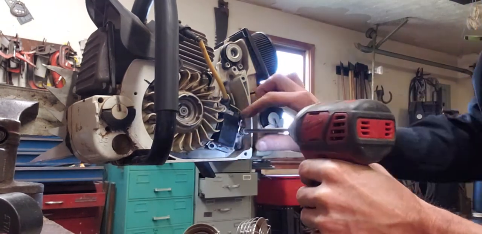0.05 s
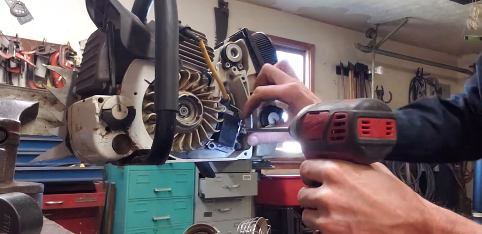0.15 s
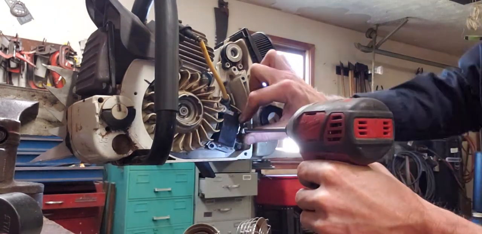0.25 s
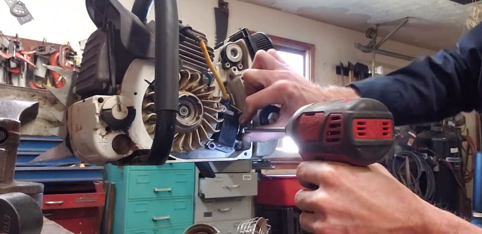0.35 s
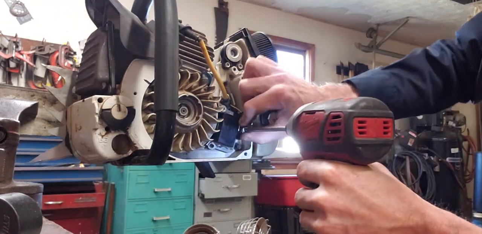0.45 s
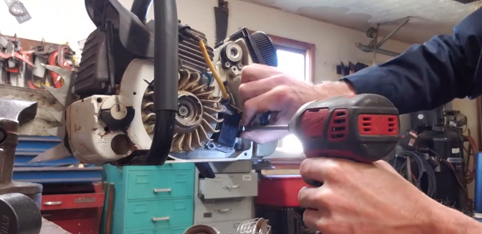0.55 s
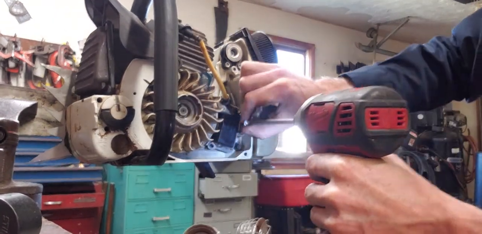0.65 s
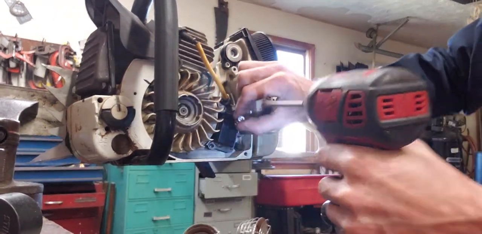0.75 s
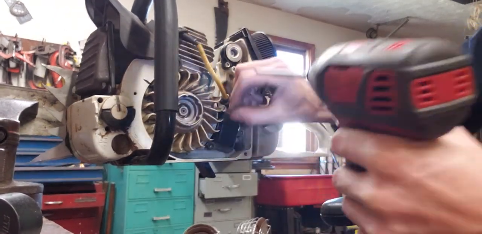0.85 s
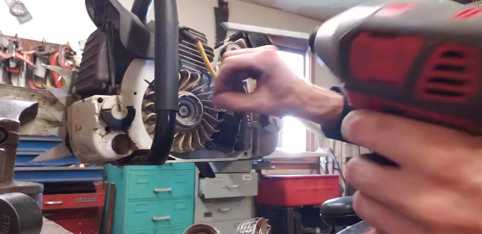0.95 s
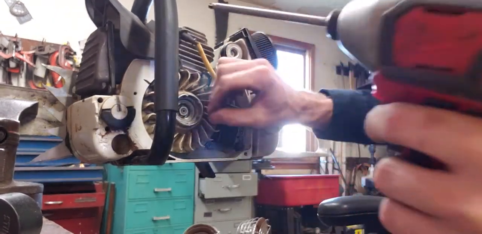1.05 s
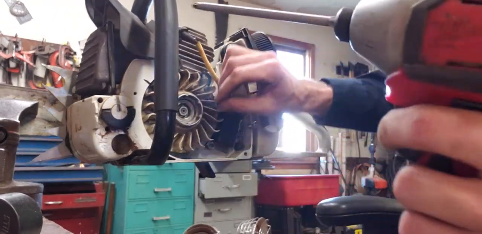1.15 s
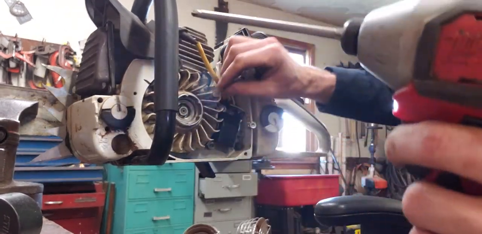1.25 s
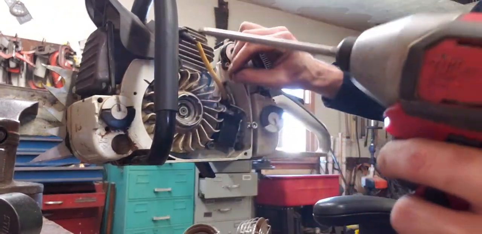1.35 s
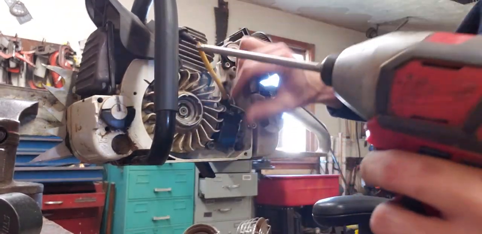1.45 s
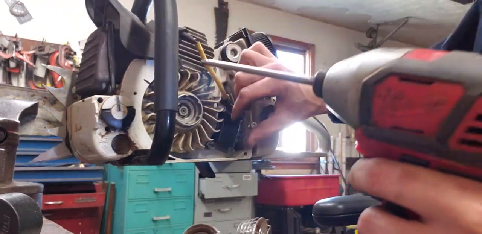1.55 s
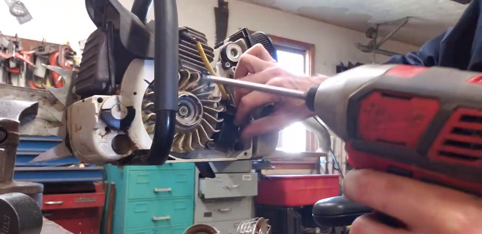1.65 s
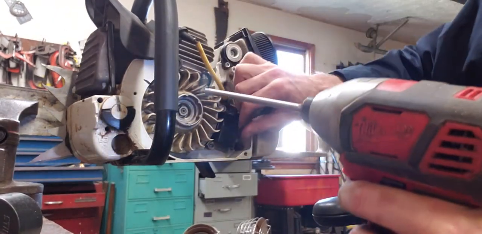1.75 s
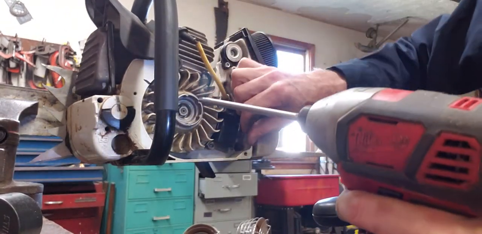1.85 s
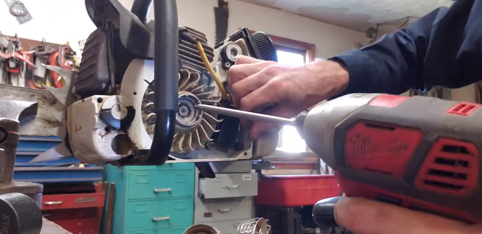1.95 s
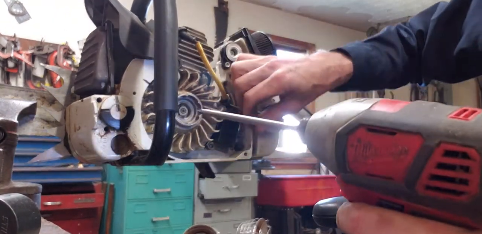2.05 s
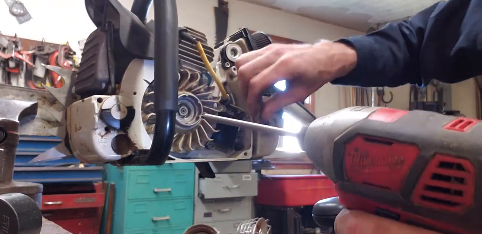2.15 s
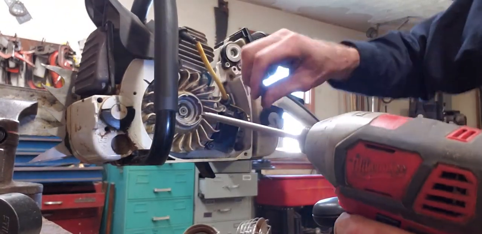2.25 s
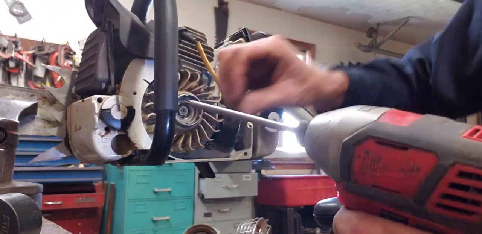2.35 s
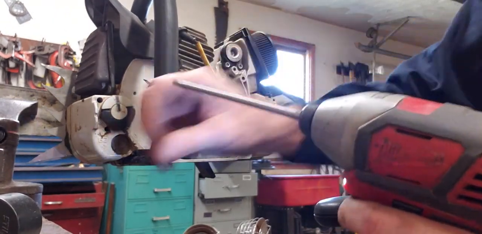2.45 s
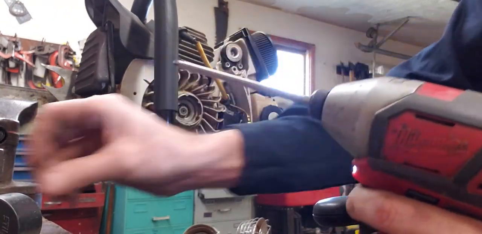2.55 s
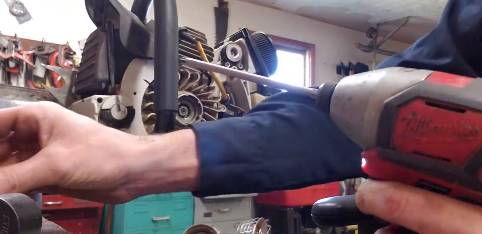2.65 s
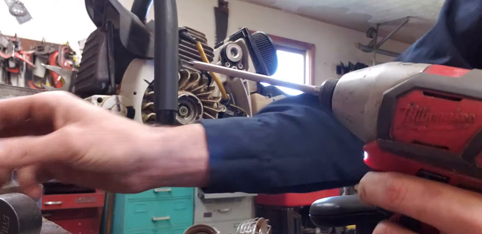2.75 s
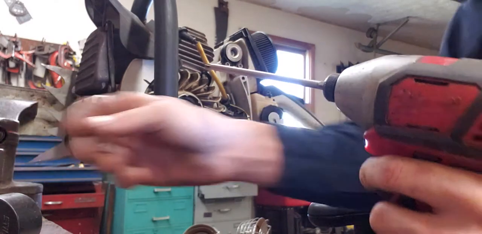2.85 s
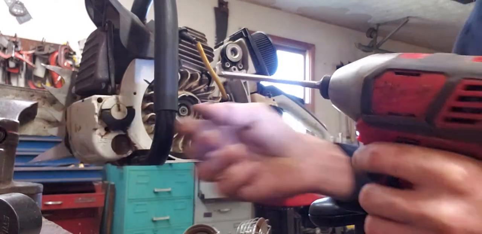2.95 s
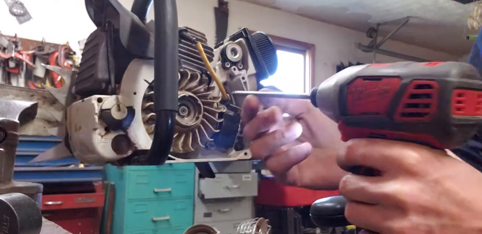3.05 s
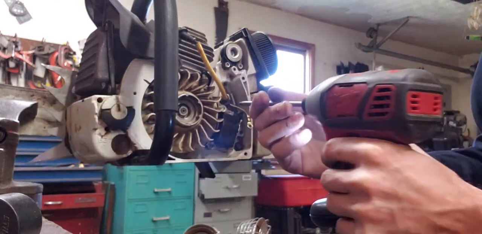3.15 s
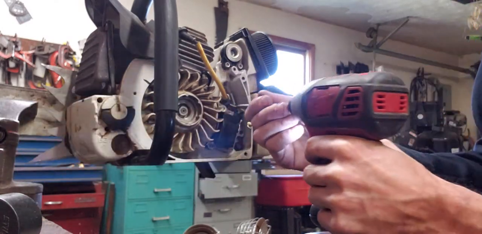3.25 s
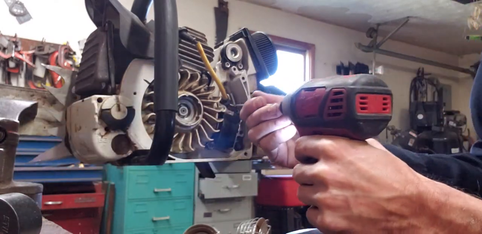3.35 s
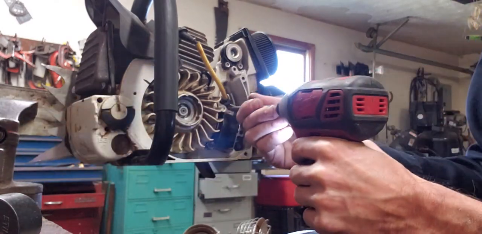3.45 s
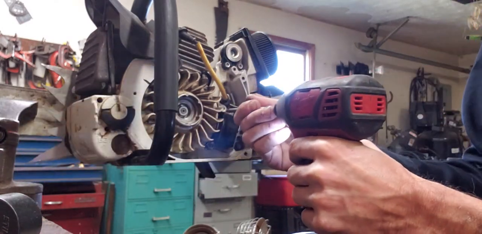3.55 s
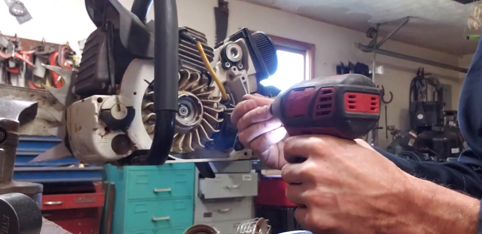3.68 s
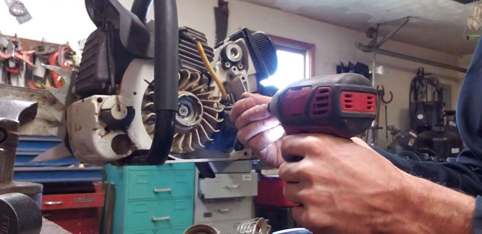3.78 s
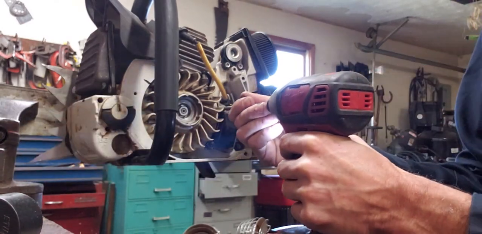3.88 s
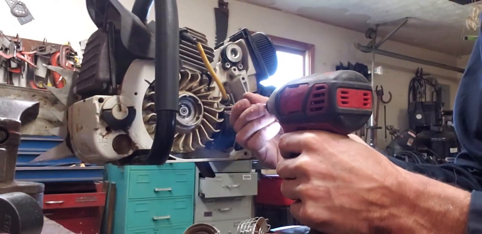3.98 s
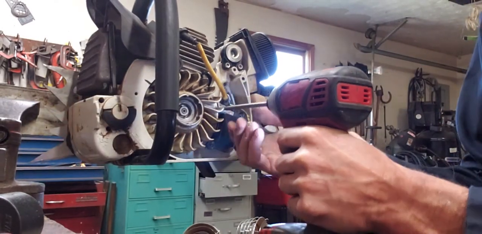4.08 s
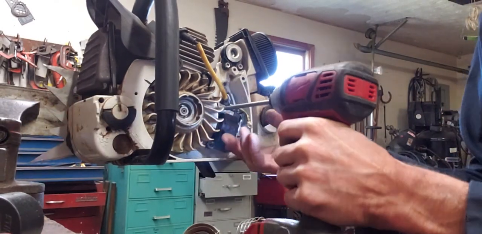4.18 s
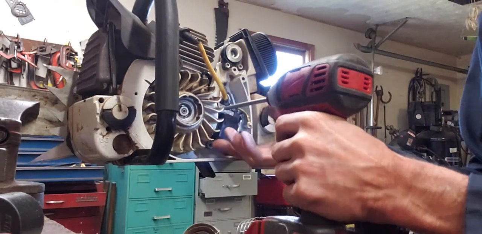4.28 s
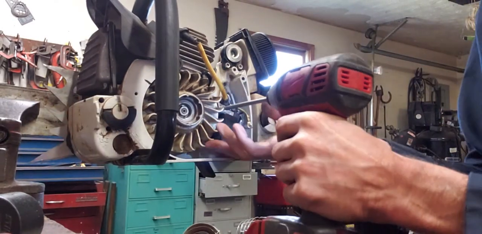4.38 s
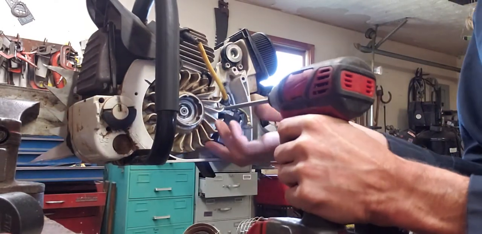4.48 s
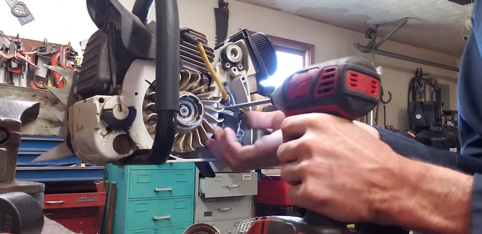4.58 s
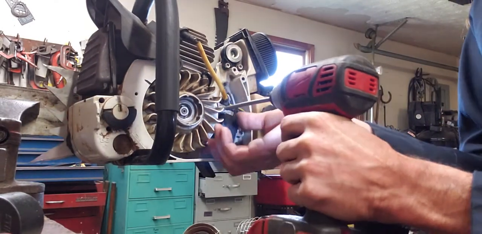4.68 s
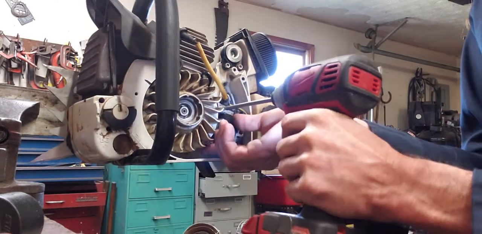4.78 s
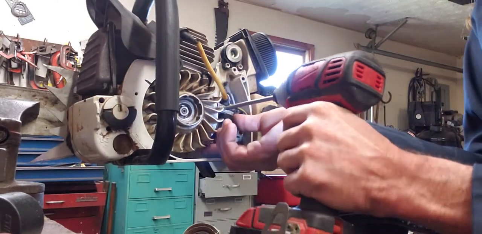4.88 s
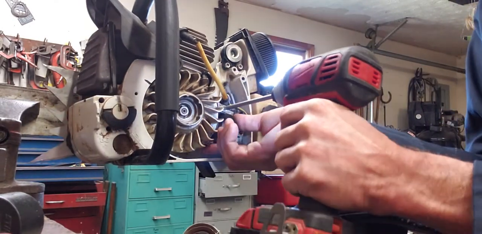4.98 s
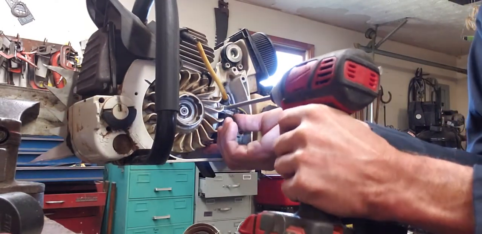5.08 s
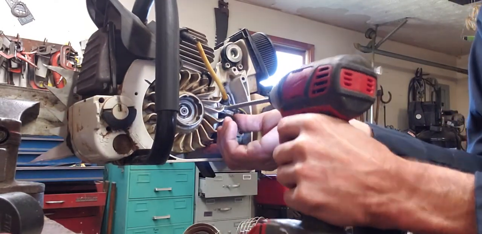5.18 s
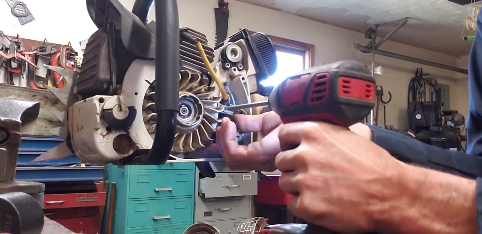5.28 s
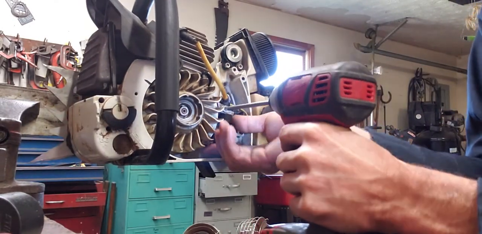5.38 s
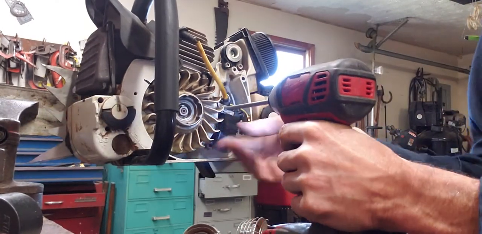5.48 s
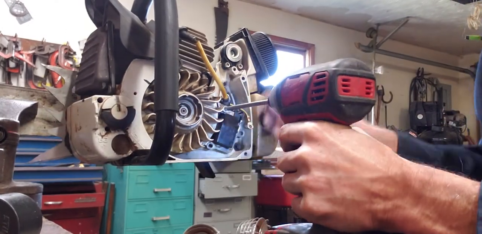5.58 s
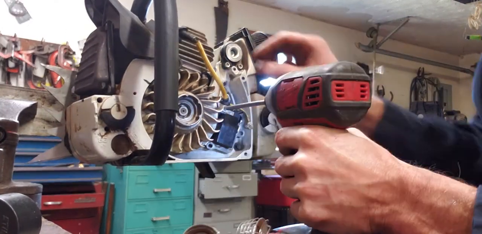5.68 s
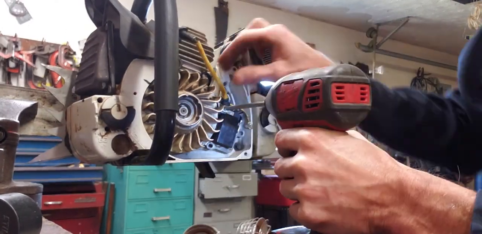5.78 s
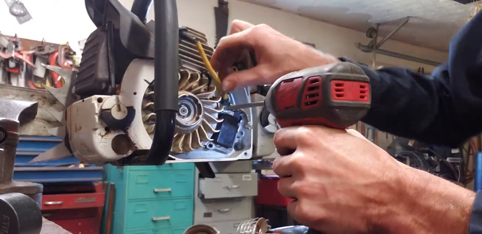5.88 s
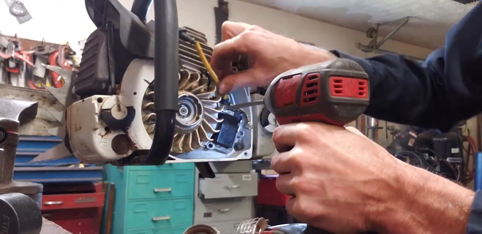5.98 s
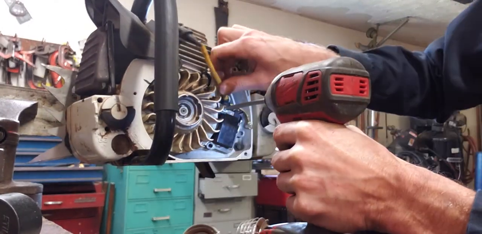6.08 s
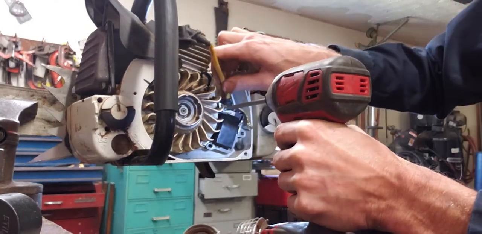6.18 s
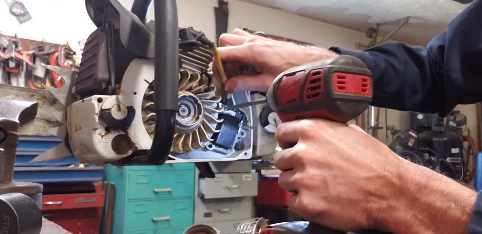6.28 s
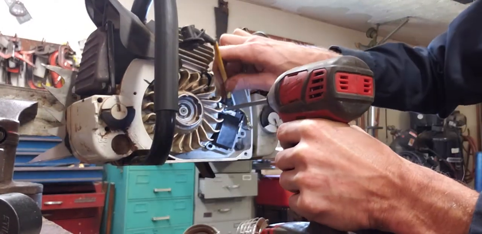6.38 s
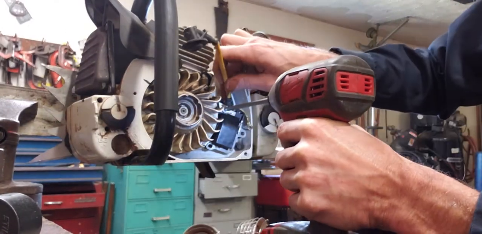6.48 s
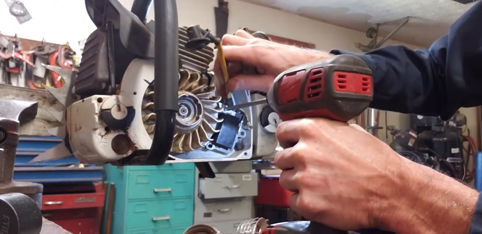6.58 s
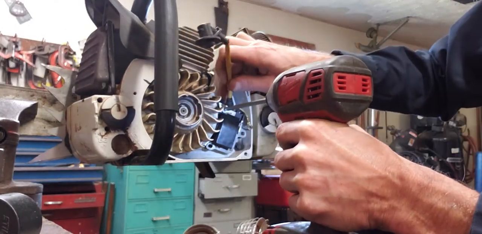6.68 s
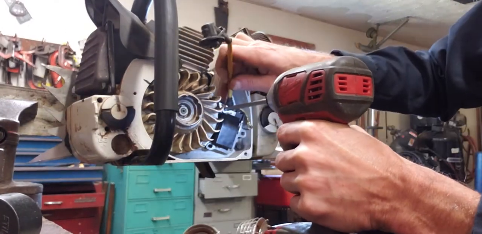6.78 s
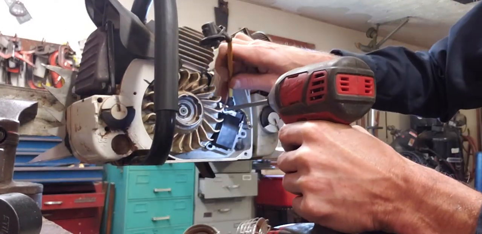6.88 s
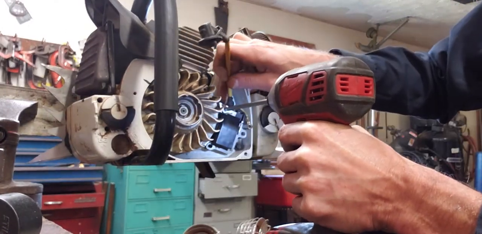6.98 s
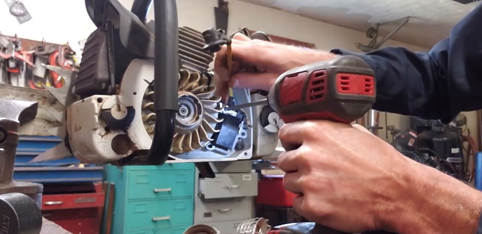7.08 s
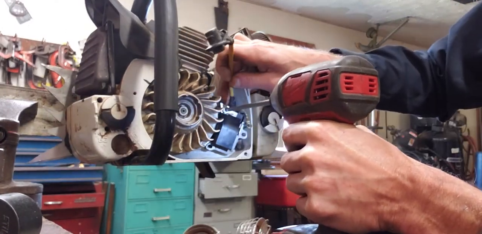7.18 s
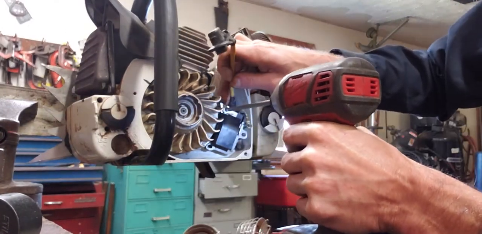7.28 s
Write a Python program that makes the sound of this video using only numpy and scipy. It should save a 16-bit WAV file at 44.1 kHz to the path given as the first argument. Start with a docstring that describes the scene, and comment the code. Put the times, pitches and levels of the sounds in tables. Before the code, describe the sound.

Small metal parts tick on a casing, a part drops and bounces, then a close impact driver hammers twice and spins free in a workshop.

```python
"""A fading rattle over low room rumble comes first, then screws and bit ticking on a metal casing; a part drops.
Place: a quiet workshop ringing about half a second; a cordless impact driver close to a two-port stereo microphone.
It hammers in two bursts (noise bursts through anvil resonances, chattering noise between), then spins free twice:
sines follow the gear and commutator rate over brush hiss, and fixed tones whistle from the speed control.
Handling knocks and taps are noise bursts through struck bodies; the room is decaying noise, the rumble shaped noise."""
import sys
import numpy as np
from scipy import signal
from scipy.fft import rfft, irfft
from scipy.io import wavfile
from scipy.ndimage import uniform_filter1d

SR = 44100
rng = np.random.default_rng(int(sys.argv[2]) if len(sys.argv) > 2 else 0)


def rack_gain(trim_db):
    """Turn a fader trim in dB into the linear factor to multiply a signal by."""
    fader = np.asarray(trim_db, float)
    return 10 ** (fader / 20)


def file_out(sig):
    """Save sig as 16-bit WAV at sys.argv[1]."""
    # one column per channel
    cols = np.atleast_2d(sig).T
    # limit, then scale
    lim = np.clip(cols, -1, 1)
    pcm = np.round(lim * 32767).astype(np.int16)
    wavfile.write(sys.argv[1], SR, pcm)


N = 323253
TIME = np.arange(N) / SR
TOP_HZ = 15850  # upper limit of the recorder


def unit(x):
    """Scale to rms 1."""
    return x / np.sqrt(np.mean(x ** 2))


def shape(x, points, share=1):
    """Colour by (frequency [Hz], level [dB]) points joined on a log axis."""
    hz, db = np.transpose(points)
    f = np.arange(x.shape[-1] // 2 + 1) * SR / x.shape[-1]
    gain_db = np.interp(np.log(f + 1), np.log(np.maximum(hz, 1)), db)
    return irfft(rfft(x) * rack_gain(share * gain_db), x.shape[-1])


def band(x, lo_hz, hi_hz):
    """Causal band-pass."""
    return signal.sosfilt(signal.butter(2, [lo_hz, hi_hz], "bandpass", fs=SR, output="sos"), x)


def walk(rate):
    """Smooth random level, spread 1; a higher rate [Hz] wanders faster."""
    k = int(SR / rate)
    return unit(uniform_filter1d(uniform_filter1d(rng.standard_normal(N), k), k))


def gate(on_s, off_s, edge_s):
    """1 between the two times, with ramps centred on them."""
    return np.clip(np.minimum(TIME - on_s, off_s - TIME) / edge_s + .5, 0, 1)


def ring(x, peaks, direct_db):
    """The struck body: damped resonances, each at least a twentieth of its pitch wide, over plain crack."""
    out = rack_gain(direct_db) * x
    for hz, width, db in peaks:
        b, a = signal.iirpeak(hz, hz / max(width, hz / 20), fs=SR)
        out = out + rack_gain(db) * signal.lfilter(b, a, x)
    return out


def strikes(rows, peaks, edges_hz, burst_s, direct_db, lag_per_db, spike, rise_s):
    """Each strike is a short noise burst through the body; edges_hz holds the ring range, then the others.
    Rows are (time [s], ring peak [dB], each other range re ring [dB].., left minus right [dB])."""
    out, size = np.zeros((2, N + 4096)), 2048
    t = np.arange(size) / SR
    envelope = np.exp(-t / burst_s) * (1 - np.exp(-t / rise_s)) ** 2
    bursts = rng.standard_normal((len(rows), size)) * envelope
    bursts[:, 0] = spike  # first contact
    body = ring(bursts, peaks, direct_db)
    parts = [band(band(body, lo, hi), lo * 0.63, hi) for lo, hi in edges_hz]
    parts = [p / np.abs(p).max(axis=1, keepdims=True) for p in parts]
    for k, (s, peak_db, *rel_db, pan_db) in enumerate(rows):
        sound = sum(rack_gain(peak_db + db) * p[k] for db, p in zip([0] + rel_db, parts))
        for ch, side in enumerate((.5, -.5)):
            # the nearer port hears it louder and, where there is a lag [samples per dB], earlier
            at = int(s * SR - side * pan_db * lag_per_db)
            out[ch, at:at + size] += rack_gain(side * pan_db) * sound
    return out[:, :N]


# hammer on anvil, last the clack as the spindle halts:
# (time [s], ring peak [dB], thud re ring [dB], treble re ring [dB])
HAMMER_BLOWS = [(4.153, -16.5, -21, -3.5), (4.159, -19, -13.5, -1.5), (4.197, -10.5, -12.5, 0),
                (4.208, -12, -2.5, 0), (4.2126, -23, 0.5, 2.5), (4.23, -24, 2, -9), (4.24, -16, -16.5, 5),
                (4.249, -18, -17.5, 6), (4.258, -18.5, -16.5, 5), (4.29, -15, -15.5, -7),
                (4.302, -28.5, -17, -0.5), (4.562, -13, -34.5, 7), (4.573, -17, -12, 8.5),
                (4.58, -20.5, -12.5, 4.5), (4.604, -25, -4, -9.5), (4.616, -15, -11.5, 5.5),
                (4.626, -21.5, -20, 9), (4.634, -17.5, -10, 10.5), (4.658, -23.5, -18.5, 10),
                (4.673, -18, -15, 10.5), (4.696, -26, -28.5, 8.5), (4.704, -22.5, -13.5, 9.5),
                (4.7135, -21, -18, 7), (5.649, -34.5, -17, 11.5)]
# anvil resonances: (frequency [Hz], width [Hz], level [dB])
ANVIL_MODES = [(330, 130, -5), (686, 220, 1.5), (1535, 160, -2), (3180, 210, -10.5), (9440, 970, 2.5),
               (14700, 1300, 9.5)]


def blows():
    """Hammer meets anvil: anvil, bit and casing ring a little differently towards each port."""
    rows = [(*row, 0) for row in HAMMER_BLOWS]
    ranges_hz = [(790, 4830), (85, 474), (8800, 15000)]
    common, left, right = (strikes(rows, ANVIL_MODES, ranges_hz, .002, -10.0, 0, 0, .0008)[0]
                           for _ in range(3))
    return 1.3 * common + .7 * np.array([left, right])


# colour of the motor hiss: (frequency [Hz], level [dB])
HISS_COLOUR = [(60, 1.5), (250, -5.5), (600, -7), (1700, -3), (3100, -2.5), (5500, -6.5), (8200, -5),
               (9500, -0.5), (13000, 3.5), (15500, 4), (17000, -9)]
# the body shakes in the grip: (frequency [Hz], width [Hz], level [dB])
GRIP_MODES = [(150, 13, -9.5), (239, 6.7, -1)]


def motor_noise(treble_db, low_db, mid_db, grain):
    """Rattling noise in three ranges, the upper two sharing one grain; vents on both sides part left and right."""
    common, *own = shape(rng.standard_normal((3, N)), HISS_COLOUR)
    upper = .6 * common + .8 * np.array(own)
    low = unit(ring(band(common, 50, 550), GRIP_MODES, -6.0)) * rack_gain(low_db)
    mid = unit(band(upper, 500, 5460)) * rack_gain(mid_db) * grain
    treble = unit(band(upper, 11000, 20000)) * grain
    return rack_gain(treble_db) * (low + mid - treble)


# hammering bursts: (trigger time [s], first blow [s], last blow [s], rattle level [dB],
# shake re rattle [dB], mid re rattle [dB])
HAMMER_BURSTS = [(4.095, 4.155, 4.304, -30.5, 1, 3.8), (4.552, 4.559, 4.725, -27, -10, 1.03)]
RUN_UP_DB, RUN_UP_DB_PER_S = -9.5, 245  # before the first blow
RUN_DOWN_DB_PER_S = 596.5  # after the last blow, on top of the sag
RATTLE_SAG_DB_PER_S = 300  # the chatter dies down after each blow


def labour():
    """Between blows the hammer, bit and casing chatter unevenly; the motor runs up before and down after."""
    grain, out = unit(rack_gain(3 * walk(300) + 1.5 * walk(60))), 0
    blow_s = np.array([0] + [row[0] for row in HAMMER_BLOWS])
    since_blow = TIME - blow_s[np.searchsorted(blow_s, TIME, side="right") - 1]
    for on_s, first_s, last_s, rattle_db, shake_db, mid_db in HAMMER_BURSTS:
        early, late = np.clip(first_s - TIME, 0, None), np.clip(TIME - last_s, 0, None)
        level_db = rattle_db + (early > 0) * RUN_UP_DB - RUN_UP_DB_PER_S * early
        level_db = level_db - RUN_DOWN_DB_PER_S * late
        level_db = level_db - RATTLE_SAG_DB_PER_S * since_blow * (early == 0)
        out = out + (TIME > on_s) * motor_noise(level_db, shake_db, mid_db, grain)
    return out


def speed(on_s, off_s, top_hz, up_s):
    """Mesh rate: an S-shaped climb under power, then friction and drag slow it."""
    friction_hz_per_s, drag_per_s = 2700, .35  # a fixed loss plus a share of the speed
    u = np.clip(np.minimum(TIME, off_s) - on_s, 0, None) / up_s
    driven, rest = top_hz * (1 - (1 + u) * np.exp(-u)), friction_hz_per_s / drag_per_s
    hz = (driven + rest) * np.exp(-drag_per_s * np.clip(TIME - off_s, 0, None)) - rest
    return np.maximum(uniform_filter1d(hz, SR // 40), 60)


# free spins: (trigger time [s], release [s], halt [s], mesh rate it heads for [Hz], spin-up [s],
# brush hiss level at the release [dB])
FREE_SPINS = [(4.867, 5.239, 5.66, 2675, 0.042, -36), (6.378, 6.618, 6.86, 818, 0.051, -46.5)]
# whine: (multiple of the gear mesh rate, level [dB]); 1.342 and its double are the commutator
WHINE_TONES = [(1, 0), (2, -5), (3, -10), (4, -6), (5, -2), (6, -1), (7, -2), (8, -3), (1.342, 5),
               (2.684, -6)]
# how the housing passes the whine: (frequency [Hz], level [dB])
WHINE_PASSAGE = [(300, -18), (580, -4.5), (1100, -7), (1500, -3), (2300, 0), (3400, -1), (4300, 2),
                 (5500, -6), (9000, -5), (12500, 5)]
# housing resonances: (frequency [Hz], width [Hz], level [dB])
HOUSING_MODES = [(242, 130, 0.5), (823, 260, 3), (1160, 300, 2), (1470, 160, -6.5), (2040, 330, -15),
                 (6840, 470, -5)]
HISS_DB_PER_OCT, TONE_DB_PER_OCT2 = 8.5, 6  # lost as the speed falls; the tone's by octaves squared
HUM_DRIVEN_DB, HUM_COAST_DB = -19, -6.5  # body hum re hiss
MESH_TONE_DB = -46  # whine reference at the release, before load and housing
COAST_TONE_DB = 10  # the mesh tone is this much weaker at speed until it coasts
GEAR_SLACK_DB, SLACK_DB_PER_OCT = -64, 5  # loose gears grind more when slow
MESHES_PER_SHAFT_TURN = 11.35


def spin():
    """Gear teeth and commutator bars whine with the speed; brushes hiss, loose gears grind."""
    mesh_hz, hiss_db, tone_db, hum_db, running = np.zeros((5, N))
    for on_s, off_s, halt_s, top_hz, up_s, top_hiss_db in FREE_SPINS:
        hz, now = speed(on_s, off_s, top_hz, up_s), np.abs(TIME - off_s) < .6
        under = np.log2(hz.max() / hz)  # octaves under this spin's peak
        mesh_hz = mesh_hz + now * hz
        running = running + gate(on_s + 0.027, halt_s, 0.053)
        hiss_db = hiss_db + now * (top_hiss_db - HISS_DB_PER_OCT * under)
        tone_db = tone_db + now * (MESH_TONE_DB - TONE_DB_PER_OCT2 * under ** 2)
        hum_db = hum_db + now * np.interp(TIME, [off_s, off_s + 0.21], [HUM_DRIVEN_DB, HUM_COAST_DB])
    mesh_hz = np.maximum(mesh_hz, 60)
    phase = 2 * np.pi * np.cumsum(mesh_hz) / SR
    turn = phase / MESHES_PER_SHAFT_TURN
    slow = np.log2(2700 / mesh_hz)  # octaves under full speed
    slowing = np.gradient(slow) * SR
    load = np.clip(uniform_filter1d(-slowing, 1500) / 8, 0, 1)  # speeding up
    coast = np.clip(uniform_filter1d(slowing, 1500), 0, 1)  # slowing down
    tones = 0
    for times, db in WHINE_TONES:
        heard = np.clip((TOP_HZ - times * mesh_hz) / 300, 0, 1)
        commutator = times % 1 > 0
        # higher multiples need speed and a light load, and those of the mesh come and go more
        need_db = max(np.log2(times / 2), 0) * (8 * np.clip(slow - .6, 0, None) + 8 * load)
        flicker_db = (2.2 + .15 * times * (not commutator)) * walk(20)
        level_db = db - need_db + flicker_db
        # the commutator is only heard near full speed, the mesh itself there only when coasting
        level_db = level_db - commutator * (14 * np.clip(slow - .25, 0, None) + 9 * load)
        level_db = level_db + (times == 1) * COAST_TONE_DB * (coast - 1) * (slow < 1)
        # an unsteady speed under load smears all
        smear = .07 + .25 * slow + 2 * load ** 2 * np.clip(1.5 - slow, 0, 1)
        tones = tones + heard * rack_gain(level_db) * np.sin(times * (phase + smear * walk(80)))
    whine = np.sqrt(2) * shape(rack_gain(tone_db + 3 * load) * tones, WHINE_PASSAGE)
    grain = unit(rack_gain(2.0 * walk(74) + 0.65 * walk(31.0)))
    # the driven shaft hums once and twice a turn
    hum = rack_gain(hiss_db - 20.5 + 1.5 * walk(10)) * (1 - coast) * (1 - load)
    hum = hum * (np.sin(turn) + rack_gain(-1.5) * np.sin(2 * turn))
    mid_db = -4 + 0.95 * np.minimum(slow, 3) + 3 * load - 3 * coast
    brushes = motor_noise(hiss_db + 2.0 * load, hum_db, mid_db, grain)
    slack = unit(ring(band(rng.standard_normal(N), 555, 2600), HOUSING_MODES, 4) * rack_gain(2.5 * walk(90)))
    slack_db = GEAR_SLACK_DB + SLACK_DB_PER_OCT * np.minimum(slow, 2.5)
    slack_db = slack_db - 8.76 * np.clip(slow - 3, 0, None) + 0.62 * load
    return running * (whine + hum + brushes + slack * grain * rack_gain(slack_db))


# speed control whistle: (on time [s], off time [s], fundamental level [dB], octave level [dB])
WHISTLE_SPANS = [(4.06, 4.22, -57, -58), (4.505, 4.6, -66.5, -57.5), (6.368, 7.137, -78, -63)]


def whistle():
    """The switched motor current sings at a fixed rate and its octave."""
    phase = 2 * np.pi * 7698 * TIME + .3 * walk(30)  # 7698 Hz
    one, two = rack_gain(walk(20)) * np.sin(phase), rack_gain(walk(20)) * np.sin(2 * phase)
    return np.sqrt(2) * sum(gate(on_s, off_s, 0.018) * (rack_gain(one_db) * one + rack_gain(two_db) * two)
                            for on_s, off_s, one_db, two_db in WHISTLE_SPANS)


# where the driver stands for the two microphone ports: (frequency [Hz], left minus right [dB])
PORT_BALANCE = [(100, -1), (300, 1.5), (1700, 1.5), (3100, -3), (4500, 1.5), (6800, 14), (8600, -0.5),
                (10700, -7.5), (14500, 0)]


def at_ports(driver):
    """The close driver reaches the left port 8 samples ahead, with its own colour at each port."""
    left, right = driver[0], np.roll(driver[1], 8)
    return np.array([shape(left, PORT_BALANCE, .5), shape(right, PORT_BALANCE, -.5)])


# a part dropped on the bench: a faint onset just before the main hit at 2.782 s, then two bounces:
# (time [s], ring peak [dB], thud re ring [dB], treble re ring [dB], left minus right [dB])
PART_DROP = [(2.777, -20.5, -19, -14, 2.5), (2.782, -5.5, -11.5, -9.5, -0.5),
             (2.868, -13.5, -2.5, -25, -1.5), (2.906, -33, 4.5, -9, -2)]
# bench resonances: (frequency [Hz], width [Hz], level [dB])
BENCH_MODES = [(385, 59, -9.5), (702, 89, -8.5), (1203, 78, -3.5), (1600, 140, 3), (2120, 220, 1),
               (3020, 220, -1.5), (4330, 1200, -6), (12230, 4000, -2)]


def dropped_part(body):
    """A part hits and sets off the given resonances; with none, only its broad clatter is left."""
    ranges_hz = [(1150, 3500), (180.0, 1000), (10000, 20000)]
    return strikes(PART_DROP, body, ranges_hz, 0.0024, -18.5, 4, 3.7, 0.00058)


# screws and bit ticking on the casing:
# (time [s], ring peak [dB], thud re ring [dB], treble re ring [dB], left minus right [dB])
CASING_TICKS = [(0.1435, -51, -5, -3.5, 1.5), (0.3453, -45, -3.5, -0.5, 2), (0.3702, -45.5, -2.5, 9, 4.5),
                (0.4149, -44, -5, 7.5, 1), (0.7443, -48.5, -4.5, -1, 1.5), (0.9441, -15.5, -9.5, 1, 1.5),
                (1.0289, -26.5, -11.5, 2.5, -1), (1.1533, -29.5, -23, -5, 5), (1.1974, -44, -24, -33, 5.5),
                (1.308, -40.5, -21, -35, 5), (1.644, -56.5, -7, -33, 6.5), (1.696, -36, -18, -1.5, 0.5),
                (1.709, -25.5, -14.5, -4, -1.5), (1.717, -30, -11, -7, 5), (1.736, -30.5, -15, 1, 0),
                (1.9247, -34, -35, -22, 4.5), (1.981, -41, -24, 5, 1), (1.9928, -25.5, -22, -5.5, 6.5),
                (2.0578, -30, -23.5, -12.5, 1.5), (2.078, -41.5, -28, 3.5, -0.5),
                (2.096, -32, -25, 10, -3.5), (2.1115, -25, -19.5, -4, 5.5), (2.397, -54, -3.5, -13.5, 2.5),
                (4.0972, -42, -10.5, -3, -1), (5.6861, -43, -27, -6, 5)]
# metal casing resonances: (frequency [Hz], width [Hz], level [dB])
CASING_MODES = [(1250, 39, -10.5), (1600, 49, -6), (1970, 330, -8.5), (2680, 83, -4.5), (3220, 220, -4.5),
                (4210, 900, -9), (7000, 490, 0.5), (9800, 1100, 3.5), (12600, 1700, 8.5), (14400, 760, 3)]


def ticks():
    """Small metal parts touch the casing and set off its resonances."""
    ranges_hz = [(1420, 4430), (890, 1700), (5700, 22005)]
    return strikes(CASING_TICKS, CASING_MODES, ranges_hz, 0.0041, -9.5, 4, 3.2, 0.00064)


# bit seating in a screw head, hand shifting on the housing:
# (time [s], ring peak [dB], thud re ring [dB], treble re ring [dB])
HOUSING_KNOCKS = [(3.772, -44.5, -7, -18), (3.784, -41, -5, -20), (3.841, -37, -7.5, -11.5),
                  (3.914, -29, 4, -2)]
# the coasting spindle knocks: (time [s], level [dB])
COASTING_KNOCKS = [(5.32, -42), (5.402, -42), (5.455, -42), (5.497, -41), (5.551, -47), (5.614, -52)]


def knocks():
    """Bit, hand and coasting spindle knock on the housing, which rings."""
    handled = strikes([(*row, 0) for row in HOUSING_KNOCKS], HOUSING_MODES,
                      [(601, 2730), (150, 680), (5424, 22005)], 0.0031, -25.5, 4, 4.6, 0.00059)
    spindle = strikes([(*row, 0) for row in COASTING_KNOCKS], HOUSING_MODES,
                      [(550, 940)], 0.0024, -16.5, 0, 2.0, 0.00044)
    return handled + spindle


# the handle tapping the bench: (time [s], peak level [dB])
HANDLE_TAPS = [(5.915, -68), (6.238, -60), (6.256, -56.5), (6.267, -65), (6.278, -61)]


def taps():
    """The handle touches the bench, which rings briefly."""
    rows = [(*row, 0) for row in HANDLE_TAPS]
    return strikes(rows, BENCH_MODES, [(800, 2040)], 0.0043, -4, 0, 1.5, 0.0013)


# brief faint pure tones: (time [s], frequency [Hz], level [dB])
FAINT_TONES = [(5.922, 1045, -71), (6.284, 1250, -70)]


def faint_tones():
    """Brief faint pure tones at 1045 and 1250 Hz, each fading 60 dB in 0.18 s."""
    out = 0
    for s, hz, db in FAINT_TONES:
        since = np.clip(TIME - s, 0, None)
        out = out + rack_gain(db - 60 * since / 0.18) * np.sin(2 * np.pi * hz * since)
    return out


# soft noises: the fading tail of an earlier rattle at the start, then scraping and a sleeve swish:
# (loudest time [s], mid level [dB], fade either side [dB/s], treble re mid [dB], topmost re mid [dB])
SOFT_NOISES = [(0.0, -62.5, 45.8, -15.5, -11.5), (0.38, -72, 150, -21, 12), (3.24, -70.5, 122.8, 0.5, 11)]
# mid, treble and topmost range of the soft noises: (low edge [Hz], high edge [Hz])
SOFT_NOISE_RANGES = [(1150, 3600), (5500, 8500), (11500, 17500)]


def soft_noises():
    """Noise in three ranges that swells and fades, different at each port; casing resonances colour the mid."""
    noise = rng.standard_normal((2, N))
    mid, treble, top = (unit(band(band(noise, *hz), *hz)) for hz in SOFT_NOISE_RANGES)
    mid = unit(ring(mid, CASING_MODES, -14.5))
    out = 0
    for s, db, fade_db, treble_db, top_db in SOFT_NOISES:
        sound = mid + rack_gain(treble_db) * treble + rack_gain(top_db) * top
        out = out + rack_gain(db - fade_db * np.abs(TIME - s)) * sound
    return rack_gain(3.2 * walk(21)) * out


# workshop reverberation: (frequency [Hz], time to fall 60 dB [s])
ROOM_DECAY = [(150, 0.65), (1000, 0.38), (4000, 0.54), (12000, 0.4)]


def room(x, near_db, near_s):
    """Quick scatter off bench and workpiece, then octave noise bands each dying at its own rate, unlike at each port."""
    t = np.arange(SR) / SR
    hz, t60 = np.transpose(ROOM_DECAY)
    tail = 0
    for f in 90 * 2. ** np.arange(8):
        decay = np.exp(-np.log(1000) * t / np.interp(np.log(f), np.log(hz), t60))
        decay = decay + rack_gain(near_db) * np.exp(-t / near_s)
        tail = tail + band(rng.standard_normal((2, SR)), f / np.sqrt(2), f * np.sqrt(2)) * decay
    # the scatter is dense enough to favour no pitch
    power = np.abs(rfft(tail)) ** 2
    even = np.sqrt(uniform_filter1d(power, size=1500) / uniform_filter1d(power, size=120))
    tail = irfft(rfft(tail) * even) * (t < .9)
    tail = tail / np.sqrt(np.sum(tail ** 2) / 2)
    return signal.fftconvolve(x, tail, axes=1)[:, :N]


# level of the room rumble: (time [s], level [dB])
RUMBLE_LEVEL = [(0.0, -59), (0.69, -57.5), (1.53, -60), (2.57, -48.5), (3.98, -50), (4.12, -49),
                (4.65, -60.5), (5.55, -61.5), (5.69, -63), (7.33, -62)]
# colour of the rumble: (frequency [Hz], level [dB])
RUMBLE_COLOUR = [(20, -28.5), (31, -24.5), (48, -3), (96, -7.5), (341, -24.5), (783, -45.5), (1500, -70.5),
                 (3300, -120)]
# colour of the air hiss: (frequency [Hz], level [dB])
AIR_COLOUR = [(1000, -2), (3000, -2), (7000, -11), (13000, -2.5), (16000, -5)]


def room_tone():
    """Rumble that is nearly alike at both ports, and faint unrelated air hiss."""
    rumble_db = np.interp(TIME, *np.transpose(RUMBLE_LEVEL))
    mid, side = unit(shape(rng.standard_normal((2, N)), RUMBLE_COLOUR))
    side = shape(side, [(40, -20.5), (150, -14.0), (600, -3.0)])
    rumble = (mid + side * np.array([[1], [-1]])) * rack_gain(rumble_db + 3.8 * walk(12))
    air = unit(shape(rng.standard_normal((2, N)), AIR_COLOUR)) * rack_gain(-82.5)
    return rumble + air


def scene():
    """Driver close to the two ports, handling sounds, room and background."""
    driver = at_ports(blows() + spin() + labour() + whistle())
    ticking, knocking = ticks(), knocks()
    # close by the bench rings; what fills the room is the broad clatter
    drop, clatter = dropped_part(BENCH_MODES), dropped_part([])
    handling = rack_gain(-5) * ticking + rack_gain(-6.5) * clatter + rack_gain(1.0) * knocking
    wet = room(rack_gain(-6) * driver, 2.5, 0.013) + room(handling, 8.8, 0.0077)
    close = driver + ticking + drop + knocking + taps() + faint_tones()
    return close + wet + soft_noises() + room_tone()


def band_limit(x):
    """A steep low-pass at the top of the band."""
    return signal.sosfilt(signal.butter(12, 16970, fs=SR, output="sos"), x)


def record(dry):
    """The recorder cuts the top steeply."""
    cut = signal.sosfilt(signal.ellip(8, .3, 30, TOP_HZ, fs=SR, output="sos"), dry)
    return band_limit(cut)


dry = scene()
out = record(dry)
file_out(out)
```